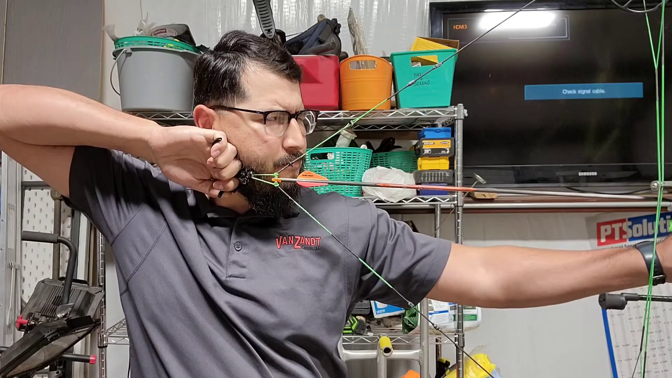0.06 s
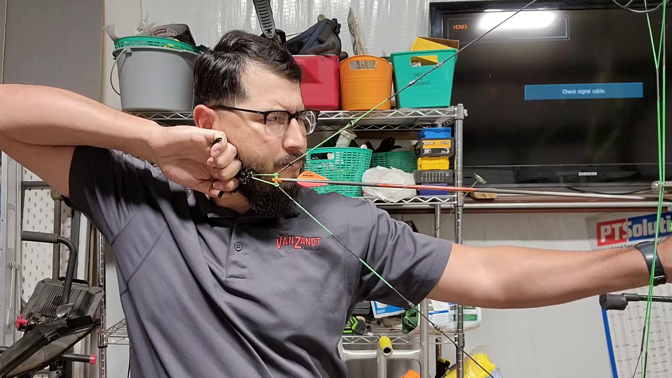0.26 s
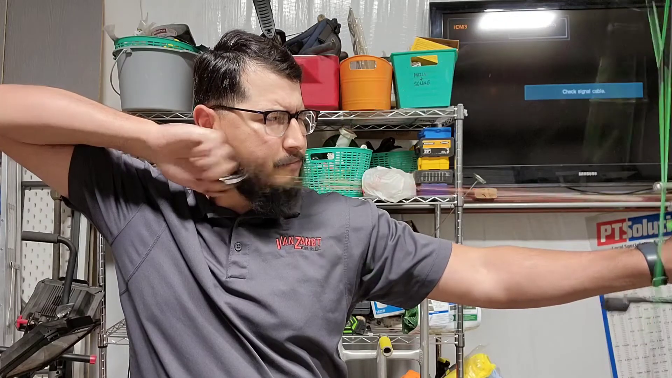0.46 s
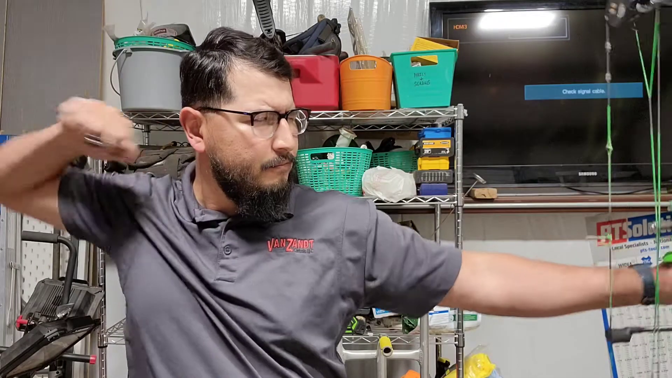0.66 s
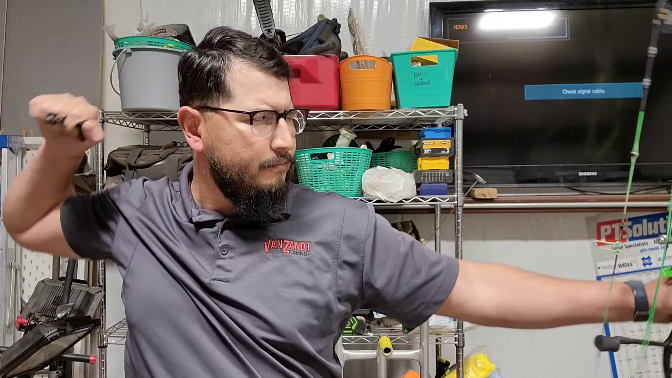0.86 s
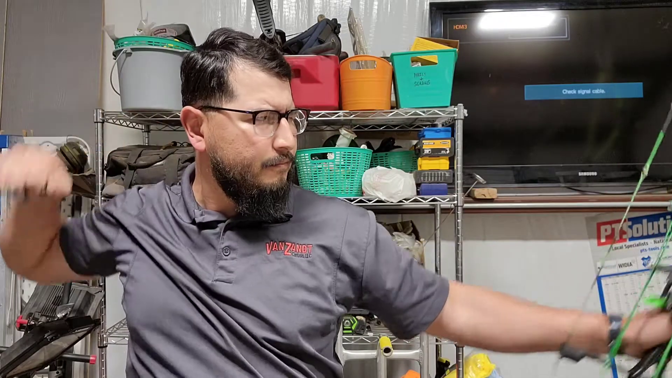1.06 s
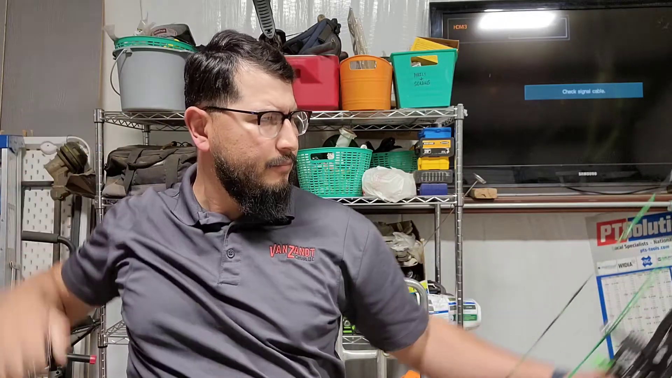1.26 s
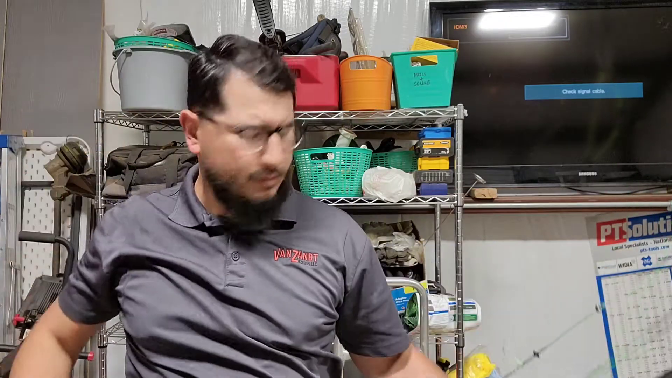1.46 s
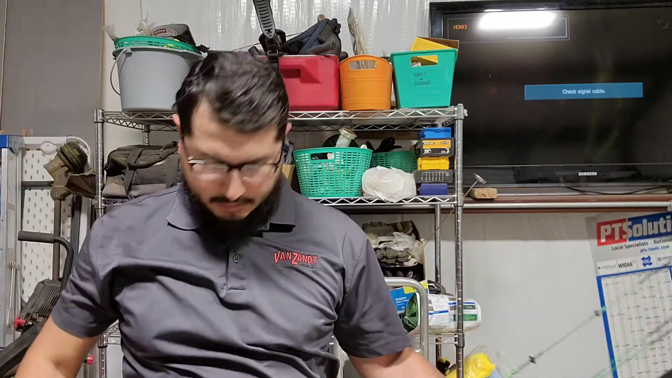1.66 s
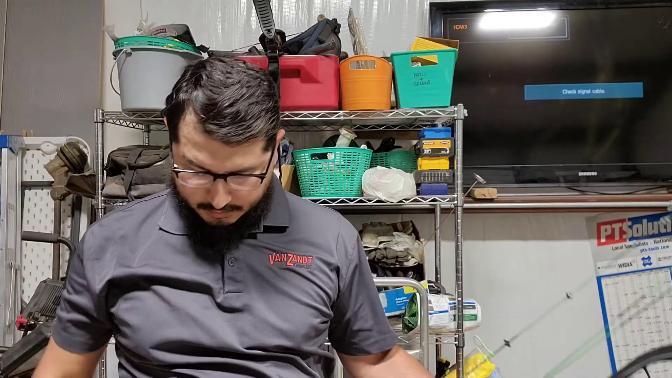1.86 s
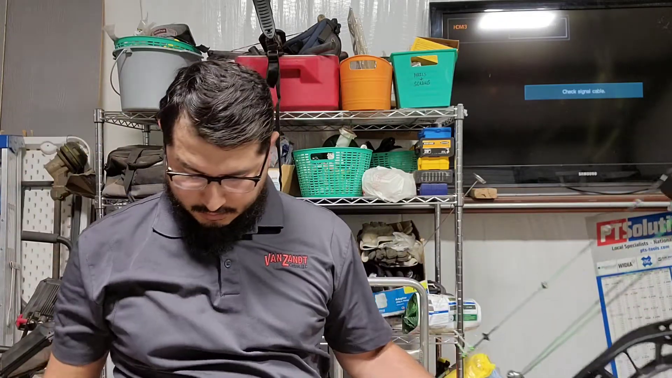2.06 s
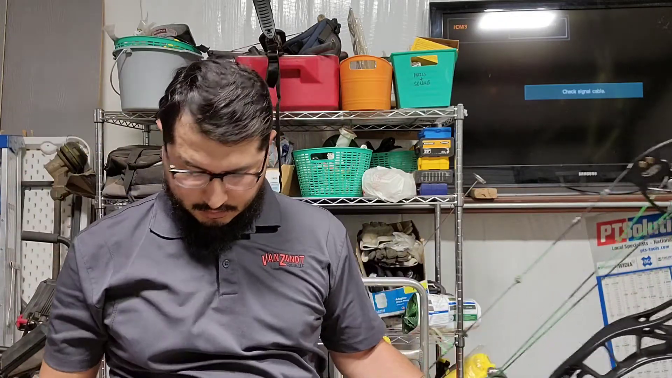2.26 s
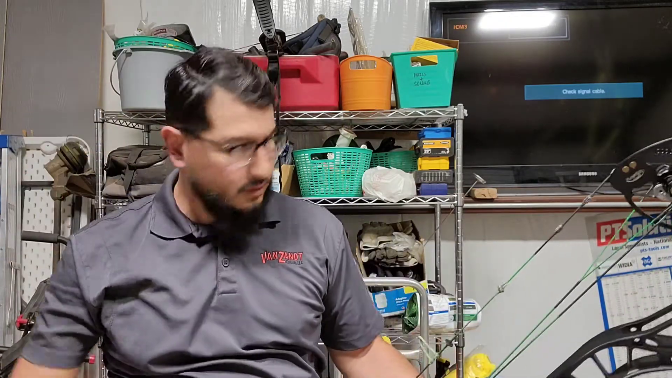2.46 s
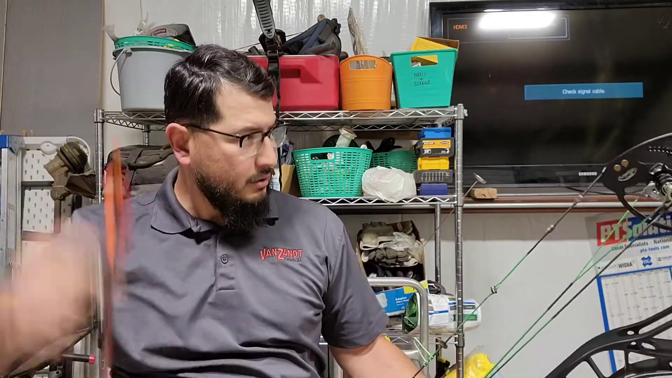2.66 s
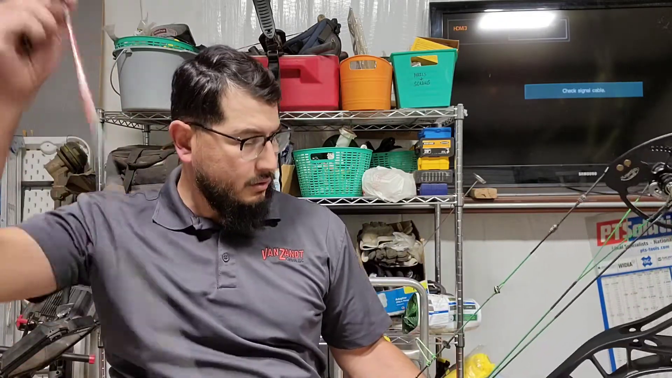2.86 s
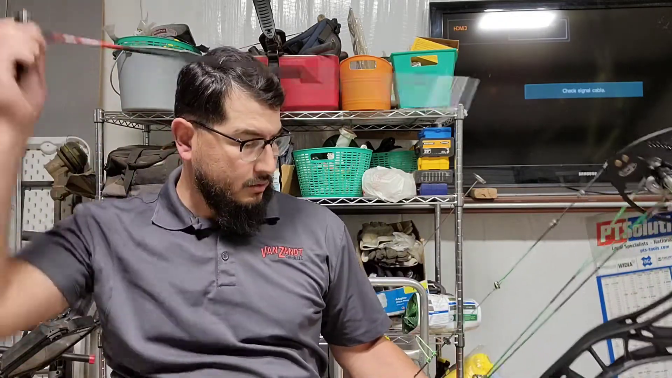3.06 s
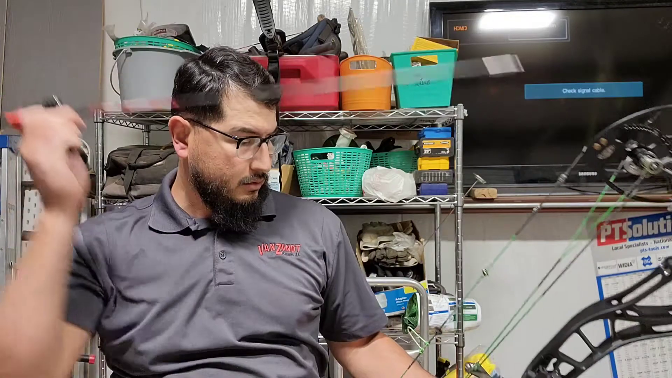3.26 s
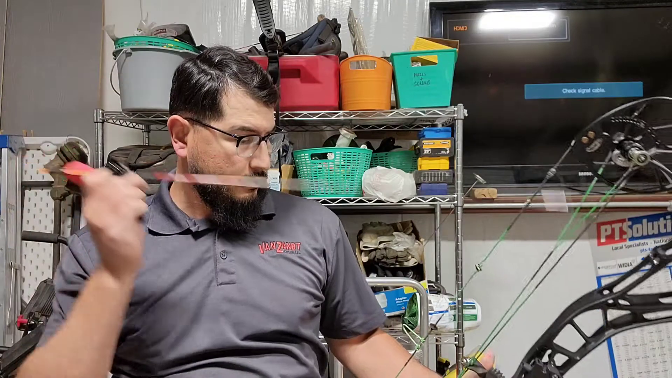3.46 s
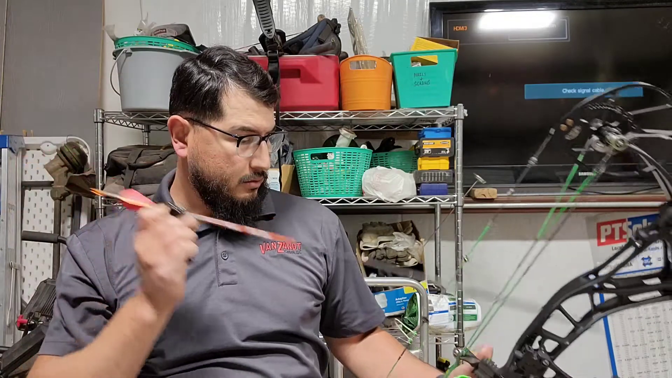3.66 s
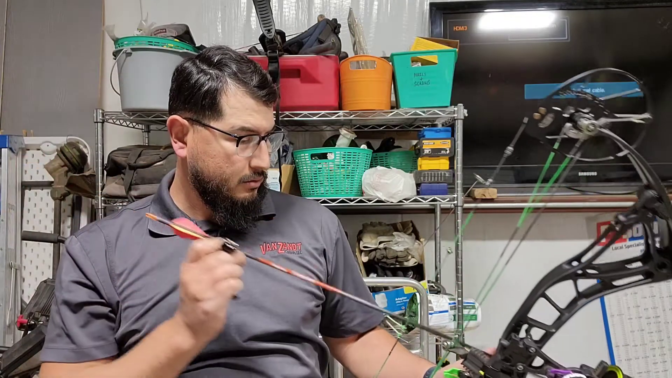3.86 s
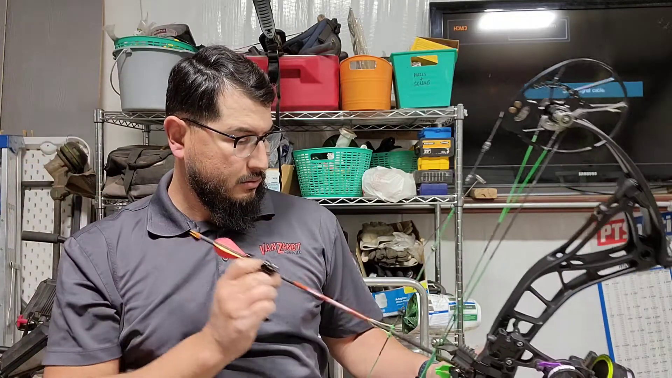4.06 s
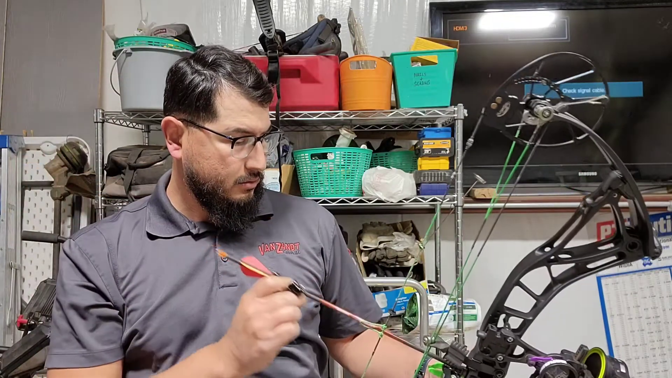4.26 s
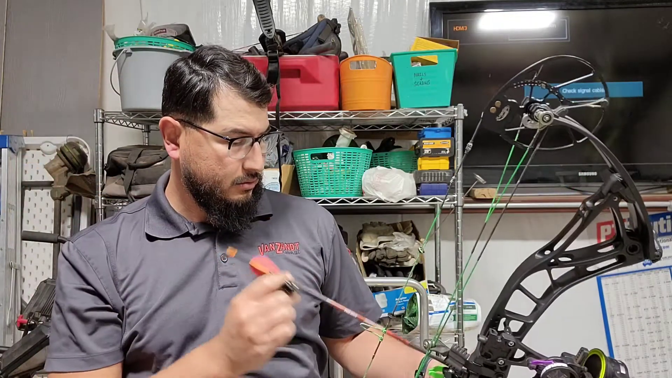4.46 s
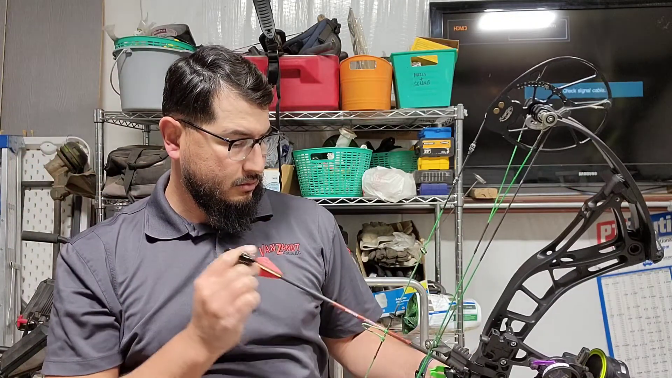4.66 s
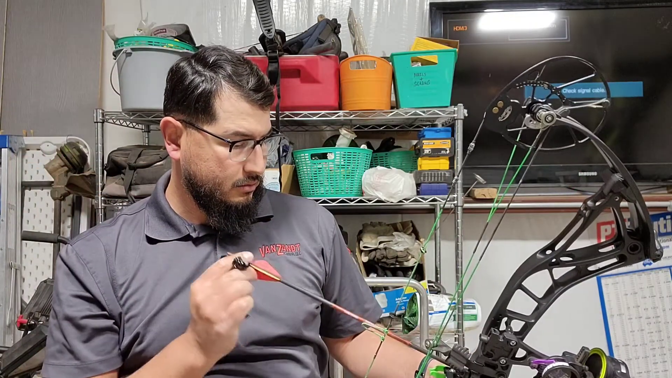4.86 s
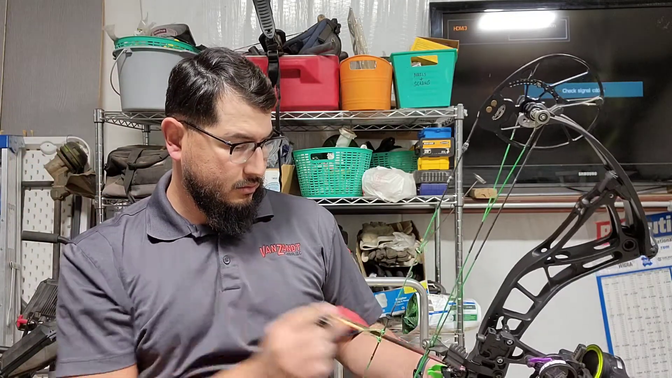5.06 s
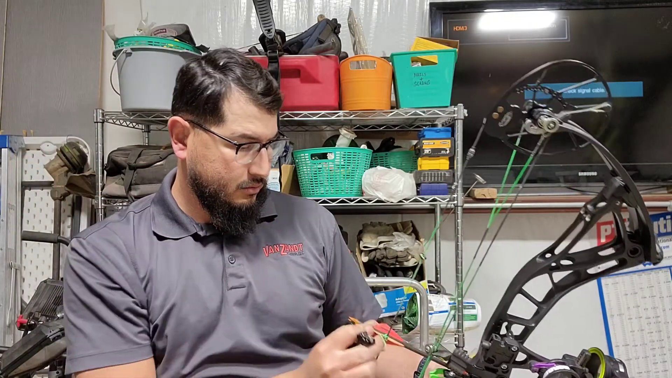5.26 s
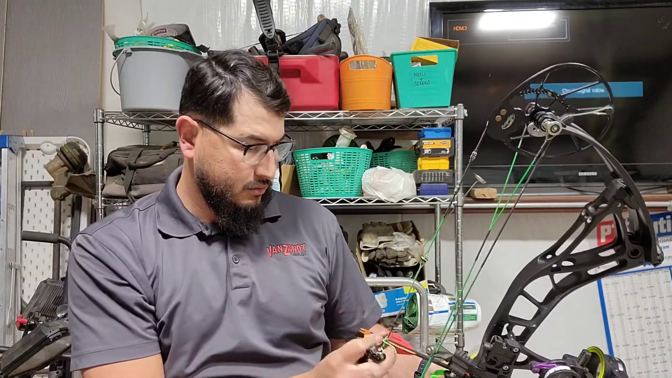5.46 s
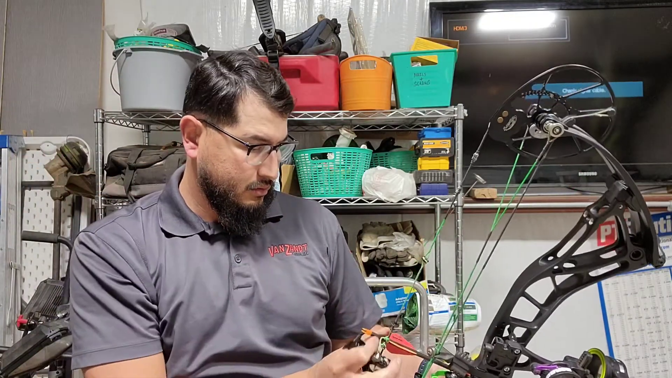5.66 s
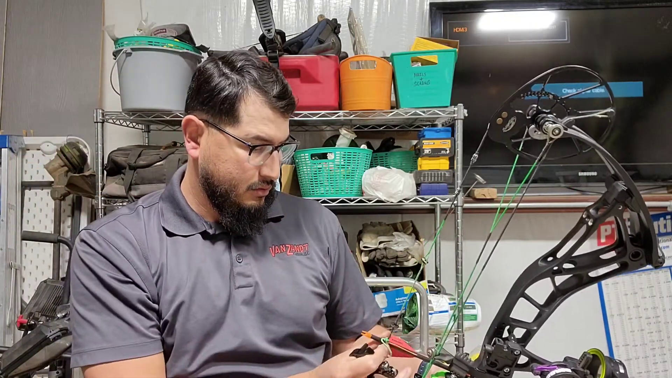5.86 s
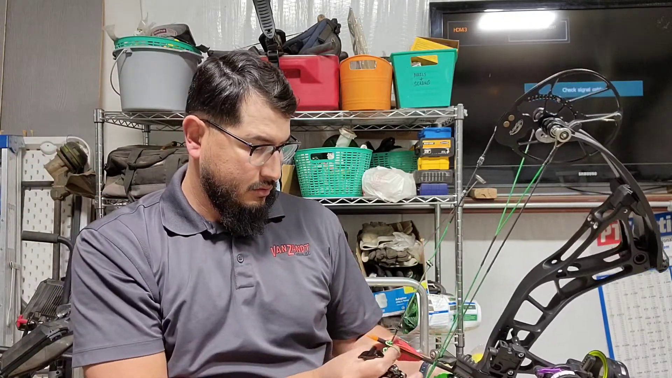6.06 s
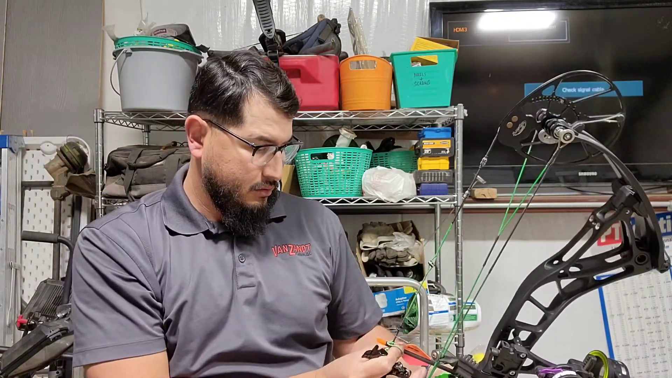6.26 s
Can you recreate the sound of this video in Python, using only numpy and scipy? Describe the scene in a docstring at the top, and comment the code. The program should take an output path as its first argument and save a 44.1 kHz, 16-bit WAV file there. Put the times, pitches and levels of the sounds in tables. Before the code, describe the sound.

A small cluttered workshop, heard close in stereo, with steady low ventilation rumble, faint hiss and soft mains hum. At 0.6 s a compound bow fires, by far the loudest event: a metallic release click, a sharp snap, rattling cams and cables, then the string slamming its stop at 0.65 s, fluttering as limbs and riser give a low twang that fades within about a third of a second in short bright reverberation. Around 1.5-1.7 s shirt cloth swishes softly with a faint dull knock. From 2.5 s an arrow slides gritty and dry from foam, vanes sizzling briefly, with knocks at 2.7 and 2.83 s. A tiny tick comes at 3.3 s. Crisp nocking clicks with slight shaft ring fall at 3.93, 4.1 and 4.2 s, a softer one at 4.36. Light scrapes and faint buckle jingles follow at 4.9-5.5 s, then weak ticks at 5.6 and 5.8 s before quiet room air.

```python
"""A compound bow is shot in a small, cluttered workshop: forced vibration, heard close by in stereo.
The release clicks, cams and cables rattle, the string slams home, and limbs and riser ring as a low twang.
The bow is lowered with a rustle; then an arrow is drawn, nocked, and the release is fingered. Stick-slip
friction makes rubbing and scraping, short contacts excite resonances for knocks, and filtered noise and
sines make the air's rumble, faint hiss and soft hum. Decaying noise makes the workshop's reverberation."""
import sys
import numpy as np
from scipy import signal
from scipy.fft import rfft, irfft
from scipy.io import wavfile

SR = 44100
rng = np.random.default_rng(int(sys.argv[2]) if len(sys.argv) > 2 else 0)


def store_wav(level_fs):
    """Save 16-bit WAV to argv[1]."""
    pcm = np.round(np.clip(np.atleast_2d(level_fs), -1, 1) * 32767)
    wavfile.write(sys.argv[1], SR, pcm.T.astype(np.int16))


N = 278271
TIME = np.arange(N) / SR  # [s]
TAIL = TIME[:SR]  # the first second, long enough for every ringing [s]
TOP_HZ = 15800  # upper band limit

# Table levels are relative; t60 is the time of a 60 dB decay.

# Pushes on limbs and string: (time [s], level [dB], length of the push [s])
BOW_PUSHES = [(0.620, -8, 0.0066), (0.6471, -7, 0.00038), (0.666, 0, .0022)]
# Modes of limbs, riser and string: (frequency [Hz], level [dB], t60 [s])
BOW_MODES = [(59.3, -28.5, .38), (83, -30, .36), (98.3, -30, 0.33), (115, -31, .25), (170, -29, 0.13),
             (217, -28, .2), (268, -24, .15), (296, -23, .12), (428, -29, .22), (478, -18, .08),
             (530, -21, .073), (630, -20, .09), (794, -23, .12), (1187, -24, .12), (1340, -27, 0.08)]
BOW_PHASE = 0.34  # the large bow reaches the two microphones out of step [rad]
# The string keeps bouncing on its stop, each time weaker and softer
REBOUND_S, REBOUND_DB, REBOUND_LOSS_DB, REBOUND_PUSH_S = .0172, -8, 2.2, .002

# Modes of the release's steel jaw: (frequency [Hz], level [dB], t60 [s])
JAW_MODES = [(2925, -2, 0.11), (5000, -9.5, 0.04), (6260, -7.5, 0.046), (6740, -15.5, .1)]
JAW_DB = -31.5
# Spectrum of the rattling cams and cables: (frequency [Hz], level [dB])
RATTLE_COLOUR = [(200, -24), (600, -7.5), (950, -12.5), (1250, -6.5), (1800, -8.5), (2700, -6),
                 (3800, -4.5), (5200, -3), (6500, -12), (9000, -13), (15000, -15)]
# The rattle rises after release, holds until just past the string's stop, then settles
RELEASE_S, RATTLE_RISE_AND_HOLD_S = .602, 0.061
RATTLE_DB, RATTLE_RISE_S, RATTLE_T60_S = -26, .023, 0.17
# Release opens, nock leaves the string: (time [s], level [dB], centre [Hz], sharpness Q [-])
SNAP_BLOWS = [(0.601, -7, 3000, 3.5), (0.6024, -6, 7000, 0.3), (0.6204, 3, 4000, 4),
              (0.625, -2.5, 6500, 0.5)]
SNAP_T60_S, SNAP_LEAD_MS = 0.016, .11
# The running string sings briefly
SING_S, SING_DB, SING_HZ, SING_Q, SING_T60_S = .625, -3, 366, 4.7, 0.14
# String slaps its stop and rebounds: (time [s], level [dB], centre [Hz], chatter t60 [s])
STRING_SLAPS = [(0.6476, 3, 650, 0.0042), (0.6517, -2, 495, 0.0016), (0.655, -3, 480, 0.0022),
                (.6612, -1.5, 500, .02), (0.665, 1.5, 130, .0022)]
SLAP_Q, SLAP_LEAD_MS = 0.89, .45

# Knocks of bow, quiver, nock and release:
# (time [s], level [dB], centre [Hz], sharpness Q [-], nominal t60 [s])
PART_KNOCKS = [(1.470, -33, 600, 0.93, .099), (1.664, -40, 6450, 30, 0.2), (2.724, -24.5, 1036, 0.92, 0.11),
               (3.318, -46, 2600, 5.3, .1), (2.8259, -14, 2350, 1.9, .007),
               (2.8277, -16.5, 2300, 1.6, .007), (3.9362, -11, 3450, 3, .014),
               (3.9375, -10, 3600, 1.5, .012), (4.2133, -10, 4980, 0.65, 0.0085),
               (4.2203, -19, 4720, 0.65, 0.022), (4.2232, -18, 3305, 0.94, 0.03),
               (4.359, -26, 4290, 0.83, 0.08), (5.623, -37, 3586, 0.78, 0.04),
               (5.82, -40.5, 10990, 0.85, .0074)]
# Arrow taps quiver and rest, the spot that is hit favouring one mode:
# (time [s], click level [dB], ring level [dB], favoured frequency [Hz], its boost [dB])
ARROW_TAPS = [(2.8263, -34, -62, 1945, 14), (3.9337, -10, -47.5, 3408, 19), (4.1001, -16, -55.5, 2390, 13),
              (4.1787, -31, -65.5, 3408, 8)]
TAP_HZ, TAP_T60_S, SPOT_OCTAVES, SPOT_T60_S = 5266, 0.011, 0.028, 0.032
# Modes of the carbon arrow shaft: (frequency [Hz], level [dB], t60 [s])
SHAFT_MODES = [(716, 0, .19), (1100, -12, .08), (1670, -9, .1), (1945, -3, .1), (2390, -4, .1),
               (2993, -7, .1), (3408, -4, .09), (3639, -8, .08), (4240, -3, .1), (4797, -4, .1),
               (5460, -6, .1), (6100, -5, .1), (6767, -1, .08)]
SHAFT_HELD = 1.018  # a firm grip raises the shaft's mode frequencies by this factor
# Modes of the release's metal buckle: (frequency [Hz], level [dB], t60 [s])
BUCKLE_MODES = [(3277, -9, 0.11), (3520, 5, 0.072), (5350, -11, 0.08), (7040, 1, 0.066)]
# Buckle jingles as the hand moves: (time [s], level [dB])
BUCKLE_JINGLES = [(4.8652, -41), (5.02, -38), (5.451, -33)]

# Short scrapes: a brush of the shirt, then fingers, quiver and rest along the shaft:
# (time of peak [s], level [dB], length [s], centre [Hz])
SHORT_SCRAPES = [(1.582, -68, 0.008, 4200), (2.394, -70.5, 0.014, 2330), (2.537, -57, .014, 6950),
                 (3.171, -72, 0.017, 1800), (4.421, -65.5, 0.035, 3600), (5.04, -63.5, 0.015, 5250),
                 (5.066, -57.5, 0.0079, 2140), (5.087, -52.5, 0.0068, 4200), (5.114, -48, 0.0036, 2600),
                 (5.168, -54.5, 0.012, 3350), (5.355, -73, 0.021, 5200), (5.557, -79, 0.028, 2940)]
SCRAPE_Q = 1.2
# Light touch, weakening the low modes: (frequency [Hz], level [dB])
LIGHT_TOUCH_COLOUR = [(900, -26), (1250, -9), (1900, 3), (3400, 0), (7000, 2), (14000, 1)]
# Hard plastic and carbon parts: (frequency [Hz], level [dB])
HARD_PART_COLOUR = [(300, -14), (520, -8.5), (700, 1), (1300, -11), (2200, -8.5), (5000, -1), (7300, 1.5),
                    (9000, 0), (15000, -4)]

# Shirt swishes as the bow arm drops: (start [s], level [dB], rise [s], t60 [s])
SHIRT_SWISHES = [(1.46, -62, .12, .9), (1.63, -60, .04, .25)]
# Spectrum of rubbed shirt fabric: (frequency [Hz], level [dB])
FABRIC_COLOUR = [(200, -10), (600, -1), (1200, 0), (1900, -4), (3500, -3), (6500, -8), (9000, -19),
                 (15000, -22)]
# Pulls that slide an arrow out of the quiver: (start [s], level [dB], rise [s], t60 [s])
ARROW_PULLS = [(2.474, -53, 0.057, 0.76), (2.625, -56, 0.091, 0.27)]
# Spectrum of the arrow sliding on foam: (frequency [Hz], level [dB])
SLIDE_COLOUR = [(300, -9), (800, -16.5), (1250, -2), (1800, -10), (2800, -1), (5800, -5), (7300, -3.5),
                (9000, -20.5), (15000, -23)]
# The shaft catches on the foam in grains; pitch spread in octaves, decay in cycles per t60
GRIT_DB, GRIT_PER_S, GRIT_HZ, GRIT_OCTAVES, GRIT_CYCLES = -11.5, 700, 3250, 0.94, 84
# Vanes sizzle past the quiver's rim
VANES_S, VANES_DB, VANES_RISE_S, VANES_HOLD_S, VANES_T60_S = 2.63, -45.5, 0.01, 0.046, 0.11

# First echoes from chest, riser and shelf near the hands: (delay [s], level [dB])
HAND_ECHOES = [(.0009, -14.5), (.0018, -9.5)]
# Reverberation time of the workshop: (frequency [Hz], t60 [s])
WORKSHOP_T60 = [(60, 0.45), (250, .22), (700, 0.15), (1500, 0.21), (3000, 0.29), (6000, 0.32),
                (15000, 0.16)]
# Spectrum of the reverberation: (frequency [Hz], level [dB])
WORKSHOP_COLOUR = [(50, -16.5), (150, -5.5), (500, 0), (1200, 4), (2000, 2), (3500, 1.5), (8000, 0),
                   (15000, 2)]
ROOM_RIPPLE_DB = 2.5  # the clutter favours some frequencies over others
BOW_ROOM_DB, HANDS_ROOM_DB = -7.5, -8.5  # sent into the room

# Spectrum of ventilation rumble and hiss: (frequency [Hz], level [dB])
AIR_COLOUR = [(20, -16), (45, -8), (68, 3.5), (120, -9), (200, -13.5), (370, -22), (650, -32.5),
              (1300, -45), (5500, -47.5), (6600, -42), (8500, -43), (15500, -43.5)]
AIR_DB = -66
# Hum of mains and a fan: (frequency [Hz], rms level [dB])
HUM_TONES = [(60, -75), (119, -79.5), (415, -85.5)]
# Response of the microphones: (frequency [Hz], level [dB])
MIC_RESPONSE = [(25, -18.5), (55, -2), (1000, 6.5), (7500, 3.5), (9000, 0), (11200, -3), (13000, 2.5),
                (15000, 3)]


def shot():
    """Principle of superposition: jaw, rattle, snaps, string and twang add up to the shot."""
    out = rattle()
    add(out, ports(undb(JAW_DB) * ring(JAW_MODES), lead_ms=.05, pan_db=0.5), RELEASE_S)
    for s, db, hz, q in SNAP_BLOWS:
        add(out, blow(db, hz, q, SNAP_T60_S, SNAP_LEAD_MS), s)
    add(out, blow(SING_DB, SING_HZ, SING_Q, SING_T60_S, lead_ms=0.11), SING_S)
    for s, db, hz, t60 in STRING_SLAPS:
        add(out, blow(db, hz, SLAP_Q, t60, SLAP_LEAD_MS), s)
    return out + twang()


def twang():
    """Forced vibration: each push rings limbs, riser and string; a slow push reaches only low modes."""
    out = np.zeros((2, N))
    for channel, side in enumerate((1, -1)):
        modes = ring(BOW_MODES, side * BOW_PHASE / 2)
        for s, db, length in BOW_PUSHES + rebounds():
            push = np.hanning(int(length * SR) + 3)
            x = undb(db) * signal.fftconvolve(modes, push / push.sum())
            add(out[channel], ports(x, lead_ms=0.63, pan_db=-1.17)[channel], s)
    return out


def rebounds(count=8):
    """Inelastic rebound: each bounce after the last listed push is weaker and longer in contact."""
    last_push_s = BOW_PUSHES[-1][0]
    return [(last_push_s + (k + 1) * REBOUND_S,
             REBOUND_DB - k * REBOUND_LOSS_DB,
             (k + 1) * REBOUND_PUSH_S) for k in range(count)]


def rattle():
    """Repeated impact of cams and cables: dense irregular ticks, coloured, that rise, hold and fall."""
    ticks = colour(friction(rate=5000, spread_db=1.5), RATTLE_COLOUR)
    pair = unit(ports(ticks, lead_ms=.3, pan_db=3.0))
    hold_s = RATTLE_RISE_AND_HOLD_S - RATTLE_RISE_S
    return undb(RATTLE_DB) * pair * swell(RELEASE_S, RATTLE_RISE_S, RATTLE_T60_S, hold_s)


def blow(db, hz, q, t60, lead_ms):
    """Impact on the bow at both microphones; the longer it lasts, the more of it is chatter."""
    return ports(undb(db) * contact(hz, q, t60, chatter=t60 / .006), lead_ms, pan_db=2.63)


def clicks():
    """Impact excitation: small parts knock, taps ring the arrow shaft, the buckle jingles."""
    out = np.zeros(N)
    for s, db, hz, q, t60 in PART_KNOCKS:
        add(out, undb(db) * part(hz, q, t60), s)
    for s, click_db, ring_db, hz, boost_db in ARROW_TAPS:
        add(out, undb(click_db) * part(TAP_HZ, 0.94, TAP_T60_S), s)
        add(out, undb(ring_db) * shaft(hz, boost_db), s)
    for s, db in BUCKLE_JINGLES:
        add(out, undb(db) * jingle(), s)
    return ports(out, lead_ms=-.06, pan_db=2.5)


def part(hz, q, t60, count=48):
    """Modal superposition: a crack and a cluster of modes about hz, new for each grip; unit energy."""
    t = TAIL[:SR // 6]
    place = np.linspace(-2, 2, count) + rng.uniform(-4, 4, count) / count
    f = hz * 2 ** (place / q)
    weight = rng.choice([-1, 1], count) * np.exp(-place ** 2) * (f < TOP_HZ)
    mode_t60 = t60 * 2 ** rng.uniform(-0.58, 0.89, (count, 1))
    modes = np.sin(2 * np.pi * f[:, None] * t) * np.exp(-np.log(1000) * t / mode_t60)
    x = weight @ modes
    crack = resonate(contact(hz, q, t60=.004, chatter=1), hz, q)[:len(t)]
    # the longer the part rings, the less of its energy lies in the crack
    x = x / np.linalg.norm(x) + np.sqrt(.02 / t60) * crack / np.linalg.norm(crack)
    return x / np.linalg.norm(x)


def shaft(spot_hz, boost_db):
    """Modal coupling of the arrow shaft: the contact drives and damps the modes near spot_hz most."""
    hz, db, t60 = np.transpose(SHAFT_MODES)
    near = np.exp(-(np.log2(hz / spot_hz) / SPOT_OCTAVES) ** 2)
    return ring(zip(hz, db + boost_db * near, t60 + (SPOT_T60_S - t60) * near))


def jingle():
    """Impact and free vibration: the buckle chatters briefly and rings."""
    tick = contact(4700, 0.8, t60=0.027, chatter=3.6)
    rung = signal.fftconvolve(tick, ring(BUCKLE_MODES))[:SR]
    return undb(-5.5) * rung / np.linalg.norm(rung) + resonate(tick, 4800, 1.0)


def scrapes():
    """Stick-slip excitation: each swelling scrape rasps dryly and sings at the shaft's upper modes."""
    out = np.zeros(N)
    slips = friction(rate=3600, spread_db=-0.5, flutter_db=4.5)
    sing = ring([(hz * SHAFT_HELD, db, t60) for hz, db, t60 in SHAFT_MODES[3:]])
    for s, db, length, hz in SHORT_SCRAPES:
        rasp = contact(hz, SCRAPE_Q, t60=.002, chatter=0)  # a single push, no chatter
        rung = signal.fftconvolve(rasp, sing)[:SR]
        body = rasp + rung / np.linalg.norm(rung)  # rasp and ring of equal energy
        stroke = slips * np.exp(-((TIME - s) / length) ** 2 / 2)
        out += undb(db) * signal.oaconvolve(stroke, body)[:N]
    return ports(colour(out, LIGHT_TOUCH_COLOUR), lead_ms=.1, pan_db=3.5)


def rustle():
    """Friction noise: shirt fabric rubs; an arrow slides from the quiver, its vanes sizzling at the rim."""
    cloth, foam, rim = (friction(rate=7000, spread_db=3, flutter_db=6) for _ in range(3))
    shirt = unit(colour(cloth, FABRIC_COLOUR)) * strokes(SHIRT_SWISHES)
    foam_rub = undb(-1.0) * unit(colour(foam, SLIDE_COLOUR))
    slide = (foam_rub + undb(GRIT_DB) * grit()) * strokes(ARROW_PULLS)
    sizzle = unit(colour(rim, [(5000, -17), (9500, -11), (12500, -3.0)]))
    vanes = undb(VANES_DB) * sizzle * swell(VANES_S, VANES_RISE_S, VANES_T60_S, VANES_HOLD_S)
    return ports(shirt + slide + vanes, lead_ms=-.12, pan_db=3.5)


def grit():
    """Granular excitation: short damped rings of scattered pitch and size, rms 1."""
    out, t = np.zeros(N), TAIL[:2048]
    count = int(GRIT_PER_S * N / SR)
    for pitch, strength in np.clip(rng.standard_normal((count, 2)), -2, 2):
        hz = GRIT_HZ * 2 ** (GRIT_OCTAVES * pitch)
        grain = np.sin(2 * np.pi * hz * t) * np.exp(-np.log(1000) * hz * t / GRIT_CYCLES)
        # sqrt(hz) offsets the shorter decay of high grains
        add(out, undb(6.3 * strength) * np.sqrt(hz) * grain, rng.random() * N / SR)
    return unit(out)


def nearby(x):
    """Early reflection: the sound and its first echoes, which arrive from alternate sides."""
    out = x.copy()
    for k, (s, db) in enumerate(HAND_ECHOES):
        add(out, ports(undb(db) * x[0], lead_ms=0.26 * (-1) ** k, pan_db=-3), s)
    return out


def room(build_s=0.00021):
    """Reverberation: scatter off the shelves builds up, then each band dies at its own rate."""
    hz, s, cells = signal.stft(diffuse(SR, alike_hz=330), SR, nperseg=256)
    decay = np.exp(-np.log(1000) * s / lookup(WORKSHOP_T60, hz)[:, None])
    tail = signal.istft(cells * decay, SR)[1][:, :SR]
    build_up = 1 - np.exp(-(TAIL / build_s) ** 2)
    tail = colour(tail * build_up, WORKSHOP_COLOUR)
    peaks_hz = np.arange(400, TOP_HZ, 70)
    ripple_db = ROOM_RIPPLE_DB * np.clip(rng.standard_normal(len(peaks_hz)), -2, 2)
    tail = colour(tail, np.column_stack([peaks_hz, ripple_db]))
    return tail / np.linalg.norm(tail[0])


def background():
    """Stationary sound: diffuse noise for ventilation rumble and faint hiss, steady sines for the hum."""
    air = undb(AIR_DB) * unit(colour(diffuse(N, alike_hz=525), AIR_COLOUR))
    hum = sum(undb(db) * np.sqrt(2) * np.sin(2 * np.pi * (hz * TIME + rng.random()))
              for hz, db in HUM_TONES)
    return air + hum


def ring(modes, phase=0):
    """Free damped vibration of (frequency [Hz], level [dB], t60 [s]) modes after a blow."""
    return sum(undb(db) * np.sin(2 * np.pi * hz * TAIL + phase) * np.exp(-np.log(1000) * TAIL / t60)
               for hz, db, t60 in modes)


def contact(hz, q, t60, chatter):
    """Impulsive force of a hard contact: one push and dying chatter through a resonance; unit energy."""
    force = rng.standard_normal(SR) * np.exp(-np.log(1000) * TAIL / t60)
    force *= chatter / np.linalg.norm(force)
    force[0] = -1
    x = resonate(force, hz, q)
    return x / np.linalg.norm(x)


def friction(rate, spread_db, flutter_db=0):
    """Stick-slip: dense ticks of uneven size, rms 1; the grip varies about 100 times a second."""
    slips = rng.random(N) < rate / SR
    sizes = rng.standard_normal(N) * undb(spread_db * np.minimum(rng.exponential(size=N), np.pi))
    knots = np.arange(0, N / SR, .01)
    grip = np.interp(TIME, knots, rng.uniform(-0.39, 1, len(knots)))
    return unit(slips * sizes * undb(flutter_db * grip))


def swell(start_s, rise_s, t60, hold_s=0):
    """Amplitude envelope: a straight rise, a hold, an exponential fall."""
    age = TIME - start_s
    fall = np.exp(-np.log(1000) * np.maximum(age - rise_s - hold_s, 0) / t60)
    return np.clip(age / rise_s, 0, 1) * fall


def strokes(rows):
    """Superposed envelopes of (start [s], level [dB], rise [s], t60 [s]) movements."""
    return sum(undb(db) * swell(s, rise, t60) for s, db, rise, t60 in rows)


def ports(x, lead_ms, pan_db):
    """Time and level difference between two microphones: positive is earlier and louder on the left."""
    i = np.arange(len(x))
    lag = lead_ms * SR / 1000  # [samples]
    return np.array([undb(side * pan_db / 2)
                     * np.interp(i - round(max(-side * lag, 0)), i, x, left=0) for side in (1, -1)])


def diffuse(size, alike_hz):
    """Diffuse-field coherence: the bass is alike at both microphones, the treble nearly unrelated."""
    mid, side = rfft(rng.standard_normal((2, size)))
    alike = .95 / (1 + (np.fft.rfftfreq(size, 1 / SR) / alike_hz) ** 2)
    common = mid * np.sqrt(1 + alike)
    opposed = np.array([[1], [-1]]) * side * np.sqrt(1 - alike)
    return irfft(common + opposed, size)


def colour(x, points, size=16384):
    """Minimum-phase filtering: a causal response with the given (frequency [Hz], level [dB])."""
    cepstrum = irfft(np.log(undb(lookup(points, np.fft.rfftfreq(size, 1 / SR)))))
    # folding the cepstrum onto positive time makes the response causal
    cepstrum[1:size // 2] *= 2
    cepstrum[size // 2 + 1:] = 0
    response = irfft(np.exp(rfft(cepstrum)))
    filtered = signal.oaconvolve(np.atleast_2d(x), response[None], axes=1)
    return filtered[:, :x.shape[-1]].reshape(x.shape)


def resonate(x, hz, q):
    """Resonance: a second-order band-pass of centre hz and sharpness q."""
    g = np.tan(np.pi * min(hz / SR, .45))
    b = [g / q, 0, -g / q]
    a = [1 + g / q + g * g, 2 * g * g - 2, 1 - g / q + g * g]
    return signal.lfilter(b, a, x)


def lookup(points, hz):
    """Logarithmic frequency scale: interpolate (frequency [Hz], value) points on it."""
    f, value = np.transpose(points)
    return np.interp(np.log(np.maximum(hz, 1)), np.log(f), value)


def undb(db):
    """Level law: decibels to amplitude gain."""
    return 10 ** (np.asarray(db) / 20)


def unit(x):
    """Root-mean-square normalisation: scale to rms 1."""
    return x / np.sqrt(np.mean(x ** 2))


def add(out, x, s):
    """Linear superposition: mix x into out from time s."""
    start = int(s * SR)
    piece = x[..., :N - start]
    out[..., start:start + piece.shape[-1]] += piece


def scene():
    """Direct and reverberant sound: bow and hands arrive directly and by way of the room."""
    bow = shot()
    hands = colour(clicks() + scrapes(), HARD_PART_COLOUR) + rustle()
    send = undb(BOW_ROOM_DB) * bow[0] + undb(HANDS_ROOM_DB) * hands[0]
    reverb = signal.oaconvolve(send[None], room(), axes=1)[:, :N]
    return bow + nearby(hands) + reverb + background()


def record(dry):
    """Transducer response: the microphones colour the sound, and a steep low-pass cuts the top."""
    low_pass = signal.ellip(10, .2, 80, TOP_HZ, fs=SR, output="sos")
    return signal.sosfilt(low_pass, colour(dry, MIC_RESPONSE))


dry = scene()
out = record(dry)
store_wav(out)
```